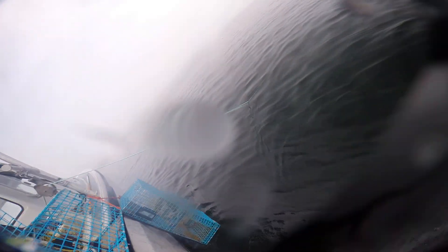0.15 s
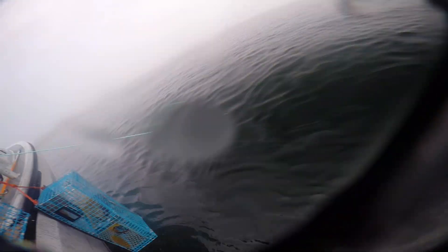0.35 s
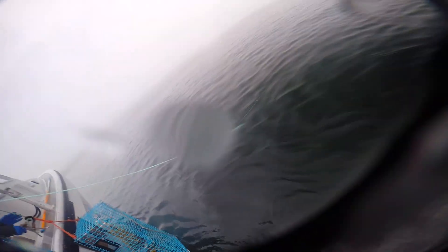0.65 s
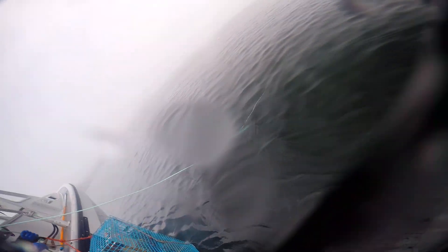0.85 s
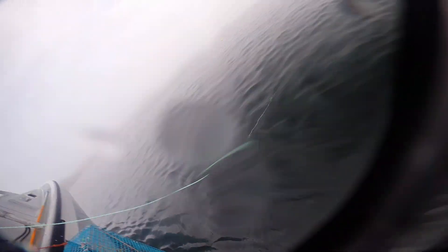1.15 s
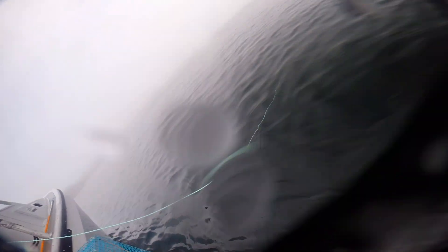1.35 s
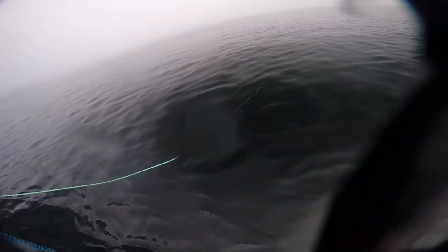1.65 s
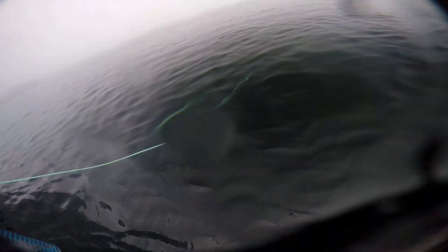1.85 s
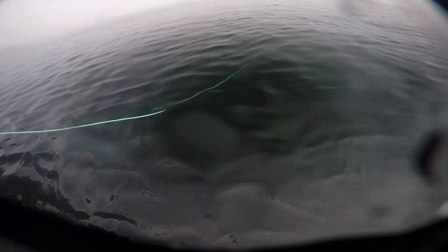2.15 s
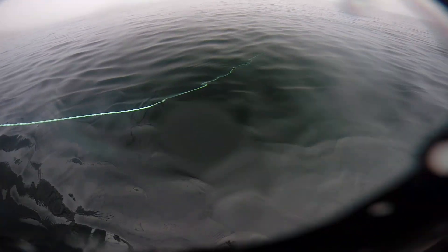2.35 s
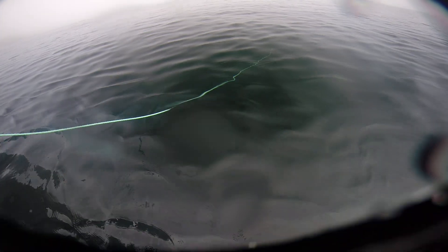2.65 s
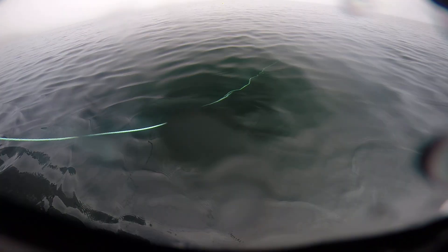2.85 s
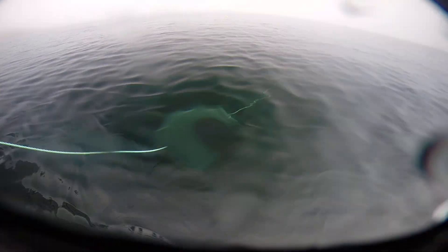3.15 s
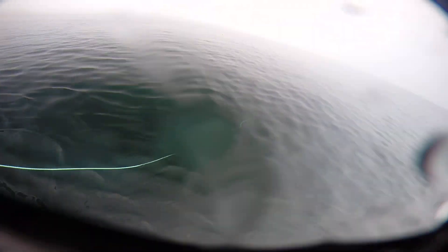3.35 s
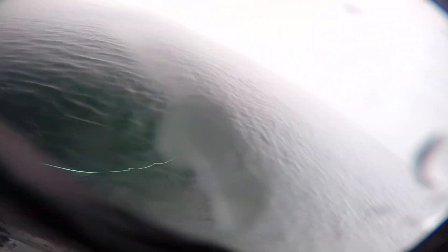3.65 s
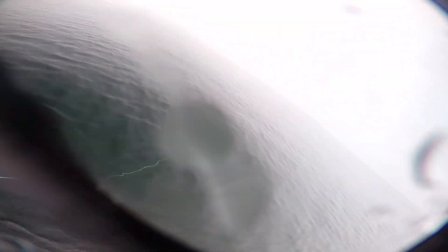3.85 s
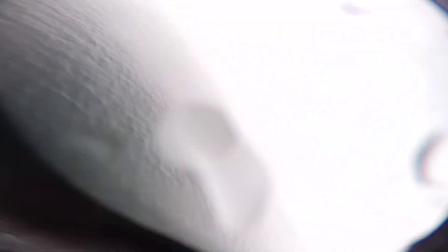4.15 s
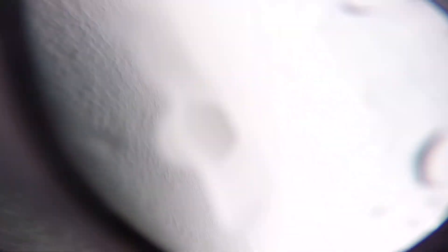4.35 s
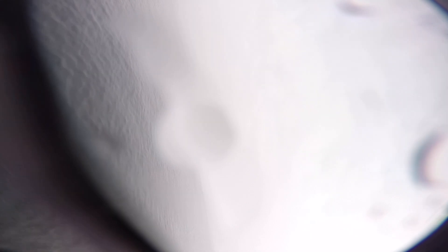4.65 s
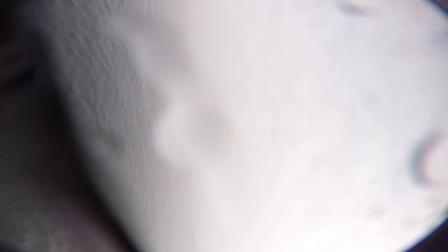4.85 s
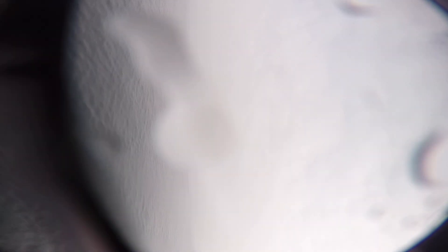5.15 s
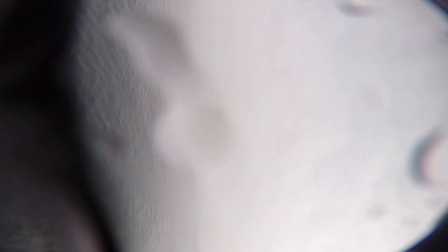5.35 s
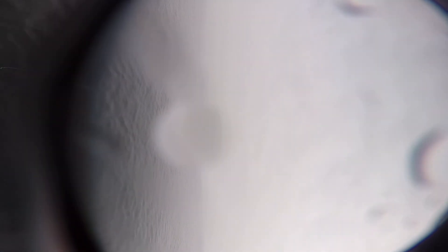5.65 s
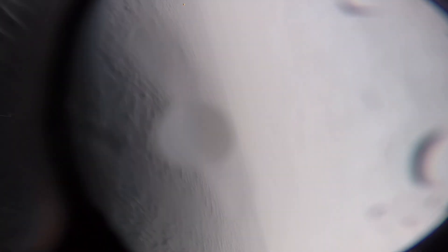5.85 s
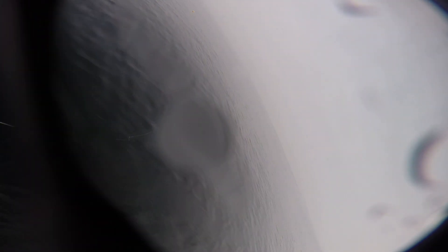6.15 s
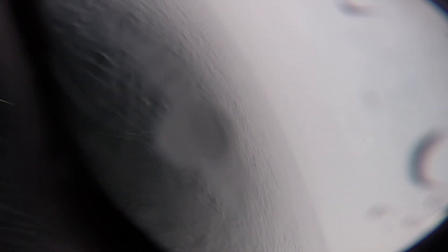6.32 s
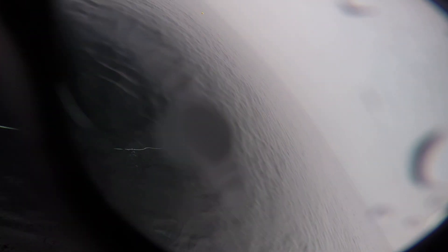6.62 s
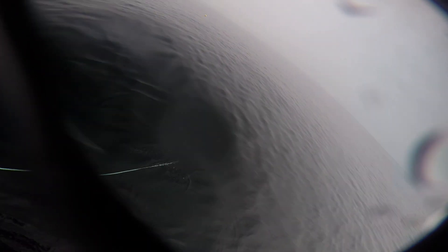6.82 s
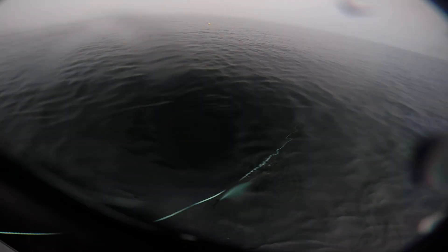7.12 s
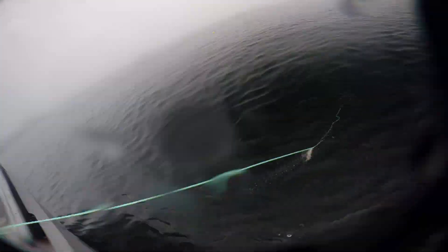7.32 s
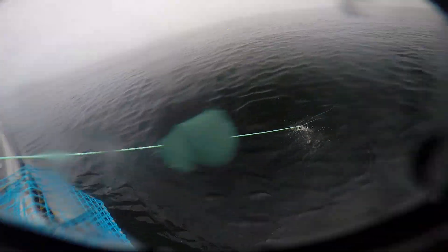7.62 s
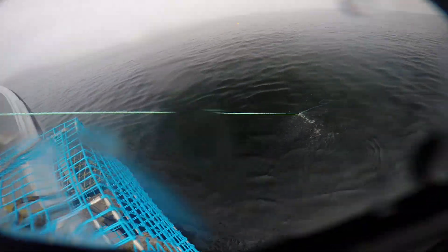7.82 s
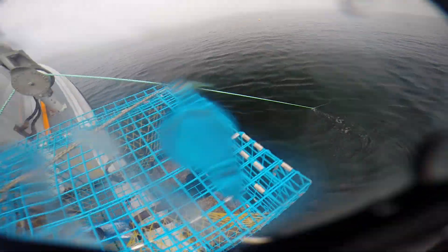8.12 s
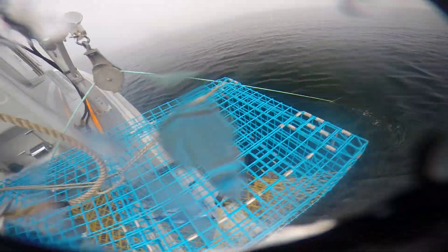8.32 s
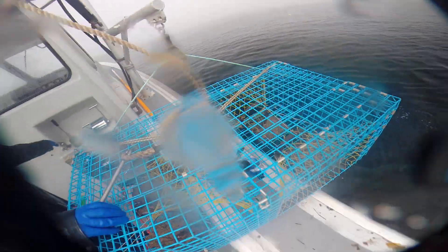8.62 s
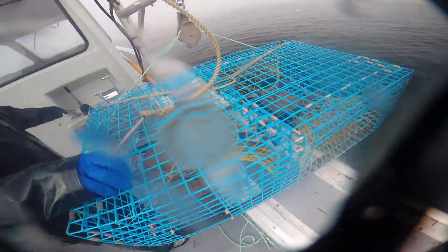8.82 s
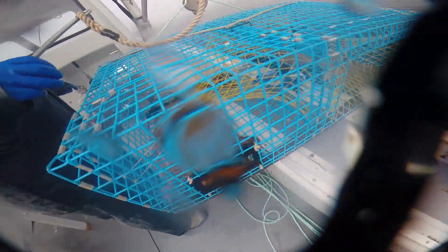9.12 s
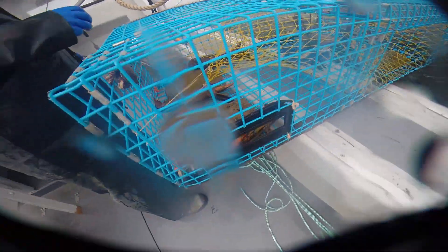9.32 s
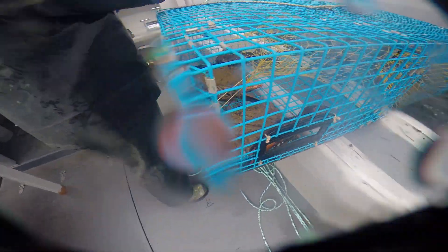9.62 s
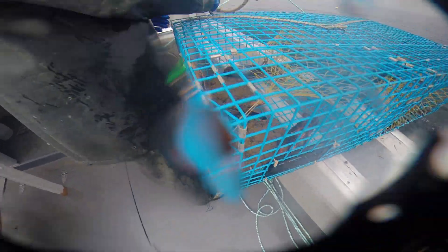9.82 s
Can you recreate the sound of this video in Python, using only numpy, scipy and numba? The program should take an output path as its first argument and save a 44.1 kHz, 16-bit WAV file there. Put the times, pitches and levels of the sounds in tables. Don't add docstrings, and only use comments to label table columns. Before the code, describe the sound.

A sealed microphone on a pole aboard a boat at sea; everything is close, boxy and muffled. From 0 to 1 s, deep wobbling rumble and groans, wet glove scrapes, a brief squeak and a cluster of hard hollow knocks around 0.3 to 0.8. From 1 to 2.5 s, rough rubbing with ringing pole tones, a squeaky catch near 1.8 and a heavy thud at 2.2. Then it quiets; faint ticks at 3.2, a loud double knock at 3.6. Dull sea hiss and a very faint high whine surface, with spray, clicks and thin wire tinks around 4.6 to 5.4. Scraping swells from 6.7, bursting into a hard ringing snap at 7.3, rubber chirps near 7.75, and a lurching groan and scrape at 8.2. Handling fades by 9, leaving muffled wash, dripping mesh and a small dull knock at 9.8.

```python
import sys
import numpy as np
from scipy import signal
from scipy.io import wavfile
from scipy.ndimage import uniform_filter1d
from numba import njit

SR = 44100
rng = np.random.default_rng(int(sys.argv[2]) if len(sys.argv) > 2 else 0)


def amplitude_ratio(level_db):
    exponent = np.asarray(level_db, float) / 20
    return 10 ** exponent


def dump(signal):
    limited = np.clip(np.atleast_2d(signal).T, -1, 1)
    pcm = np.round(limited * 32767).astype(np.int16)
    wavfile.write(sys.argv[1], SR, pcm)


N = 440118
T = np.arange(N) / SR


def unit(x):
    return x / np.sqrt(np.mean(x ** 2))


def noise():
    return rng.standard_normal(N)


def band(x, lo_hz, hi_hz, order=2):
    edges = [lo_hz, min(hi_hz, 0.45 * SR)]
    return signal.sosfilt(signal.butter(order, edges, "band", fs=SR, output="sos"), x)


def muffle(x, hz, order=4):
    return signal.sosfilt(signal.butter(order, hz, fs=SR, output="sos"), x)


def ring(x, modes):
    out = 0
    for k, (hz, width, db) in enumerate(modes):
        out = out + (-1) ** k * amplitude_ratio(db) * signal.lfilter(*signal.iirpeak(hz, hz / width, SR), x)
    return out


def walk(rate):
    hold = int(SR / rate)
    levels = np.repeat(rng.standard_normal(N // hold + 1), hold)
    return unit(uniform_filter1d(levels, hold)[:N])


def burst(start, rise, t60):
    t = np.arange(int((rise + 1.2 * t60) * SR)) / SR
    fall = amplitude_ratio(-60 * np.maximum(t - rise, 0) / t60)
    return int(start * SR), np.minimum(t / rise, 1) * fall


def add(out, i, x):
    out[i:i + len(x)] += x[:N - i]


def surge(out_power, start, db, hold, rise, fall):
    first, last = int((start - 4 * rise) * SR), int((start + hold + 4 * fall) * SR)
    a, b = np.clip([first, last], 0, N)
    t = T[a:b] - start
    slope_db = -20 * (np.maximum(-t, 0) / rise + np.maximum(t - hold, 0) / fall)
    add(out_power, a, amplitude_ratio(2 * (db + slope_db)))


def glide(rows, ratio, gain, waver):
    out = np.zeros(N)
    for start, length, db, first_hz, last_hz in rows:
        i, u = int(start * SR), np.linspace(0, 1, int(length * SR))
        span = slice(i, i + len(u))
        pitch = ratio * (first_hz + (last_hz - first_hz) * u) * waver[span]
        tone = np.sin(np.cumsum(2 * np.pi * pitch / SR))
        add(out, i, amplitude_ratio(db) * gain[span] * np.sin(np.pi * u) * tone)
    return out


# frequency in Hz, density in dB per Hz.
SEA_COLOUR = [(350, -16.5), (700, 1), (1350, -0.5), (1650, 5), (2900, -6), (4800, -20.5), (7000, -19),
              (14000, -33.5)]
# time in seconds, wash in dB, dripping wire mesh in dB.
SEA_LEVEL = [(0, -60, -88.5), (2.6, -57, -66.5), (3.4, -56, -71.5), (4.4, -56, -76), (5.3, -49, -62),
             (5.7, -53, -70), (6.3, -50, -65), (7.7, -48, -53), (7.85, -43.5, -56.5), (8.05, -43.5, -56.5),
             (8.2, -43, -51.5), (8.9, -49.5, -61), (9.5, -49.5, -59), (9.98, -49, -54.5)]
# frequency in Hz, width in Hz, level in dB.
MESH_MODES = [(3800, 600, 6), (4520, 330, 10), (5670, 800, 8)]


def sea():
    hz, density_db = np.transpose(SEA_COLOUR)
    s, wash_db, mesh_db = np.transpose(SEA_LEVEL)
    wash, swell, hiss = 0, walk(1.5), noise()
    for mid in 340 * 2 ** np.arange(0, 5.6, 0.25):
        colour_db = np.interp(np.log(mid), np.log(hz), density_db) + 10 * np.log10(mid)
        gain_db = colour_db + 0.7 * swell + 1.1 * walk(12)
        own_hiss = np.roll(hiss, int(mid))
        wash = wash + amplitude_ratio(gain_db) * unit(band(own_hiss, mid * 0.912, mid * 1.075))
    drips = noise() * amplitude_ratio(1.4 * walk(30))
    mesh = unit(ring(ring(drips, MESH_MODES), MESH_MODES))
    return unit(wash) * amplitude_ratio(np.interp(T, s, wash_db)) + mesh * amplitude_ratio(np.interp(T, s, mesh_db))


# frequency in Hz, level in dB.
WHINE_TONES = [(5850, -86), (8777, -86), (11688, -91), (14626, -83), (14690, -97)]


def whine():
    return sum(amplitude_ratio(db + 2.0) * np.sin(2 * np.pi * hz * T) for hz, db in WHINE_TONES)


# time in seconds, sway in dB.
SWAY = [(0, -17), (1.06, -35), (2.5, -31.5), (2.87, -47), (2.95, -39), (3.5, -47), (3.9, -42.5), (4.0, -36),
        (4.54, -46), (5.2, -41), (5.55, -38), (5.65, -46.5), (6.7, -32), (7.1, -24), (7.6, -22),
        (7.97, -30), (9.0, -41.5), (9.98, -46.5)]
# start in seconds, first bending in dB, second bending in dB against
# the first, hold in seconds.
LURCHES = [(0.0, -21.5, -1, 0.16), (0.102, -24.5, 6, 0.085), (0.315, -16, -7.5, 0.1), (0.447, -17, -2, 0.091),
           (0.68, -23, -15, 0.022), (0.8, -24, -9, 0.076), (1.111, -35, -32, 0.034),
           (1.256, -27.5, -30, 0.037), (1.44, -25, -1, 0.13), (1.625, -22, -13.5, 0.16),
           (1.886, -22, -3.5, 0.055), (1.99, -22, -12, 0.11), (2.2, -23.5, 2, 0.022), (2.242, -28, -5, 0.24),
           (3.034, -31.5, -15, 0.062), (4.63, -39.5, -7, 0.23), (5.295, -51, -4, 0.095),
           (7.125, -25, -14, 0.0082), (7.27, -19.5, -3, 0.035), (7.34, -16, -19, 0.033),
          (7.41, -24.5, 3.5, 0.094), (8.0, -29.5, -0.5, 0.093), (8.091, -21.5, -6, 0.053),
          (8.18, -16.5, -18, 0.11), (8.33, -15, -13, 0.042), (8.54, -27.5, 0, 0.27),
          (8.77, -27.5, -13, 0.052), (8.9, -29.5, -32, 0.042)]


def hand():
    sway_db = np.interp(T, *np.transpose(SWAY))
    slow, quick, stiff = amplitude_ratio(2 * np.array([sway_db, sway_db - 8, sway_db - 9.5]))
    rise_s, fall_s = 0.12, 0.085
    for start, slow_db, against_db, hold in LURCHES:
        quick_db = slow_db + against_db
        stiff_db = -26 + 0.8 * (quick_db + 20)
        for group, group_db in ((slow, slow_db), (quick, quick_db), (stiff, stiff_db)):
            surge(group, start, group_db, hold, rise_s, fall_s)
    scrape = amplitude_ratio(-7) * slide()[0]
    return np.sqrt([slow, quick, stiff + scrape ** 2])


# frequency in Hz, width in Hz, level in dB.
SLOW_BEND = [(30, 35, -14), (46.7, 16.6, -4), (61.5, 15, -4.5), (91, 17.5, -1.5)]
# frequency in Hz, width in Hz, level in dB.
QUICK_BEND = [(140, 9, 0), (168, 30, -10), (118, 18, -7)]
# frequency in Hz, width in Hz, level in dB.
STIFF_BEND = [(198.8, 12.6, 4), (261.2, 30.4, 4), (307, 37, 5), (381, 283, -6.5)]


def shake():
    out = 0
    for modes, gain, lumpy_db in zip((SLOW_BEND, QUICK_BEND, STIFF_BEND), hand(), (2.5, 3.5, 4.5)):
        swing = ring(noise() * amplitude_ratio(lumpy_db * walk(25)), modes)
        swing = muffle(swing, 1.76 * max(mode[0] for mode in modes), order=3)
        held = np.sqrt(uniform_filter1d(swing ** 2, int(0.09 * SR)))
        out = out + unit(swing / held ** 0.54) * gain
    return out


# start in seconds, peak in dB,
# treble in dB against the peak, length in seconds.
SPRAY = [(0, -40.5, 2.5, 0.011), (0.164, -47, -8, 0.0082), (0.2, -42.5, -8.5, .04), (0.372, -45, -9, .01),
         (0.411, -39.5, -12.5, .01), (1.098, -57, -7, .04), (1.3, -56.5, -3.5, .04), (2.436, -55, 2, .02),
         (0.653, -33, -28, 0.0043), (3.107, -33, -31, 0.017), (3.196, -32, -20, 0.03),
         (3.224, -38.5, -27, 0.085), (3.291, -60, -2, 0.015), (4.635, -33.5, -22, 0.28),
         (4.681, -35, -23.5, 0.087), (4.694, -35.5, -6, 0.025), (4.709, -40.5, -8, 0.058),
         (4.75, -41, -25, 0.07), (4.931, -34, -34, 0.026), (4.939, -36, -30, 0.068),
         (5.172, -32.5, -29, 0.14), (5.213, -38, 4.5, 0.031), (5.234, -39.5, -7, 0.036),
         (5.291, -45, -14, 0.021), (5.376, -40.5, -13, 0.044), (5.418, -41.5, -11.5, 0.055),
         (5.8846, -43, -8.5, 0.089), (9.877, -32.5, -17.5, 0.052)]


def spray():
    dull, bright = np.zeros(N), np.zeros(N)
    for start, db, treble_db, length in SPRAY:
        i, env = burst(start, 0.0039, 2.9 * np.clip(length, 0.003, 0.12))
        add(dull, i, amplitude_ratio(db - 15.0) * env)
        add(bright, i, amplitude_ratio(db + treble_db - 6.0) * env)
    grains = noise() * amplitude_ratio(4.9 * walk(250))
    drops = noise() * (0.22 + 4 * (rng.random(N) < 900 / SR))
    hollow = ring(dull * drops, [(527, 136, 1.5), (1630, 390, 1.0), (2050, 200, 4.0),
                                 (2710, 260, 3.0), (4240, 720, -5.5), (5600, 1160, -10.0)])
    hiss = unit(muffle(band(grains, 4000, 13000), 15000))
    return amplitude_ratio(22.5) * muffle(hollow, 8000) + bright * hiss


# start in seconds, peak in dB,
# frequency in Hz, ring in seconds.
CLINKS = [(0.039, -14, 2030, 0.03), (.046, -29, 2250, .02), (1.843, -14.5, 1593, 0.041),
          (1.848, -14, 1890, 0.025), (3.626, -37, 1830, 0.06), (3.642, -42, 1650, 0.052),
          (3.258, -40, 1500, .04), (3.272, -44, 1900, 0.035), (1.722, -17.5, 1596, 0.043),
          (1.8465, -7.5, 1700, 0.014), (3.2026, -23, 2715, 0.055), (3.257, -37, 2800, 0.054),
          (4.647, -31, 1900, 0.11), (4.68, -26.5, 1550, 0.069), (4.748, -31.5, 1510, 0.071),
          (5.185, -31, 1495, 0.045), (5.2974, -37, 1514, 0.044), (7.313, -0.5, 1585, 0.059),
          (8.1763, -15, 1605, 0.04), (8.858, -32.5, 1600, 0.029), (8.15, -24, 796, .09),
          (7.355, -20, 797, 0.067)]
# start in seconds, peak in dB, frequency in Hz, ring in seconds.
TINKS = [(1.3, -57, 7700, 0.046), (3.137, -39, 4000, 0.046), (3.153, -46, 5600, .03),
         (3.15, -42, 4470, 0.051), (3.2, -35, 6300, 0.037), (3.2, -32, 3880, 0.048),
         (3.228, -40, 3900, 0.042), (3.5, -50.5, 5600, 0.17), (4.66, -44, 5600, .08),
         (4.703, -35, 4340, 0.22), (4.75, -34, 2860, 0.054), (4.76, -57, 7340, .1), (4.79, -53, 3360, 0.5),
         (4.85, -54, 3380, .4), (6.36, -57, 4300, .6), (3.335, -50, 5500, .04), (3.373, -50, 5650, 0.08),
         (5.135, -56, 8000, .1), (5.365, -54, 5650, .06), (5.197, -36, 4200, 0.055), (5.02, -64, 13200, .2),
         (4.665, -64, 13100, .15), (5.195, -58, 12900, .1), (5.055, -50, 5660, 0.13),
         (5.14, -51, 5700, 0.22), (5.217, -33, 4080, 0.1), (5.3, -49, 5700, 0.35)]


def clinks():
    out, tremble, flutter = np.zeros(N), walk(250), walk(300)
    for start, db, hz, t60 in CLINKS + TINKS:
        rise_s = 0.003 if hz > 2500 else 0.007
        i, env = burst(start, rise_s, np.clip(t60, 0.01, 0.6))
        span = slice(i, i + len(env))
        depth = 0.004 if hz > 3000 else 0.012
        phase = np.cumsum(2 * np.pi * hz * (1 + depth * tremble[span]) / SR)
        tone = np.sin(phase)
        if 3000 < hz < 6000:
            tone = tone + amplitude_ratio(-24) * np.sin(1.4 * phase) + amplitude_ratio(-21) * np.sin(2.32 * phase)
        add(out, i, amplitude_ratio(db - 4 + 3 * flutter[span]) * env * tone)
    return out


# start in seconds, level in dB, hold in seconds,
# rise and fall in seconds per 20 dB.
STROKES = [(0.056, -26.5, 0.077, 0.085, 0.024), (0.162, -33, 0.055, .02, .1),
           (0.239, -31, 0.13, 0.047, .04), (.385, -43.5, 0.046, .02, 0.061),
           (0.437, -41.5, 0.071, 0.082, 0.017), (0.804, -43, 0.032, 0.17, .1),
           (0.957, -28.5, 0.12, 0.12, 0.13), (1.12, -37, 0.112, 0.11, 0.0066),
           (1.38, -29.5, 0.37, 0.026, 0.015), (1.81, -43, 0.036, 0.084, 0.044),
           (1.873, -30.5, 0.35, 0.023, 0.16), (2.299, -32.5, 0.13, .1, 0.017),
           (2.445, -46.5, 0.13, .02, .04), (3.14, -41, 0.034, 0.34, 0.14),
           (3.632, -47.5, 0.017, 0.0048, 0.014), (6.755, -29.5, 0.13, 0.05, 0.059),
           (6.974, -25, 0.14, 0.22, 0.016), (7.145, -39, 0.045, .05, .05),
           (7.254, -25.5, 0.13, 0.088, 0.32), (7.512, -37, 0.13, .1, .1),
           (7.72, -28.5, 0.0915, 0.34, 0.011), (8.089, -27.5, 0.052, 0.13, 0.19),
           (8.181, -37, 0.188, .05, 0.013), (8.394, -50, 0.11, .03, 0.059),
           (8.532, -34.5, 0.26, 0.05, 0.11)]
# start in seconds, peak in dB,
# rise and fall in seconds per 20 dB.
JERKS = [
    (0.046, -35, 0.039, 0.1),
    (.275, -33.5, 0.036, 0.11),
    (.56, -37, 0.025, 0.021),
    (1.745, -28.5, 0.12, 0.017),
    (1.85, -28, 0.024, 0.043),
    (1.946, -22, 0.066, 0.32),
    (2.182, -21.5, 0.18, 0.19),
    (6.69, -54, 0.86, .05),
    (7.32, -12.5, 0.019, 0.0097),
    (8.182, -21.5, 0.12, 0.011),
]


def slide():
    power = np.full(N, 1e-12)
    for row in STROKES:
        surge(power, *row)
    for start, db, rise, fall in JERKS:
        surge(power, start, db, 0, rise, fall)
    touch = np.clip(power / amplitude_ratio(-110), 0, 1)
    over_db = np.minimum(10 * np.log10(power) + 30, 7)
    return np.sqrt(power), touch * amplitude_ratio(-53.5 + 0.94 * over_db)


def drift(x, wander):
    speed = 0.009 * uniform_filter1d(wander - wander.mean(), 3000)
    return np.interp(np.arange(N) + np.cumsum(speed), np.arange(N), x)


# frequency in Hz, width in Hz, level in dB.
POLE = [(391, 27, 1), (777, 58, 4.5), (1020, 28, -13.5), (1188, 50, -6), (1577, 50, 3), (1710, 105, 1.5),
        (2015, 44, -0.5), (2425, 140, -5), (2796, 130, -3.5), (3063, 80, -11)]
# frequency in Hz, width in Hz, level in dB.
HOUSING = [(3725, 550, -0.5), (4230, 360, -12.5), (4790, 370, -0.5), (5600, 450, -8.5), (6355, 300, 1.5),
           (7230, 380, -6.5), (8100, 300, -15.5), (8700, 490, -11.5), (9610, 360, -12.5),
           (10950, 540, -21.5), (12750, 600, -24.5)]
# time in seconds,
# tilt in dB per octave, middle modes in dB.
GRIP = [
    (0, 1, 1),
    (1.05, 1.5, 0.5),
    (1.45, -1.5, -2),
    (1.75, 2, -1),
    (2.2, 0.5, -1.5),
    (6.8, -0.5, -2),
    (7.3, 0, 1.5),
    (7.7, 0.5, -5.5),
    (8.1, 0.5, 2),
    (8.8, -0.5, -1),
]


def rub():
    slips = noise() * amplitude_ratio(0.23 * walk(60) + 2.3 * walk(200))
    s, tilt_db, middle_db = np.transpose(GRIP)
    modes = 0
    for k, mode in enumerate(POLE):
        favour = walk(6)
        if 1500 < mode[0] < 1800:
            lean_db = np.interp(T, s, middle_db)
        else:
            lean_db = np.log2(mode[0] / 1600) * np.interp(T, s, tilt_db)
        tone = drift(np.roll(ring(slips, [mode]), 37 * k), np.roll(favour, SR))
        modes = modes + amplitude_ratio(3 * favour + lean_db) * tone
    wash = 0
    for hz in (230, 370, 590, 950, 1500, 2200):
        wash = wash + amplitude_ratio(3.7 * walk(5)) * band(np.roll(slips, int(hz)), hz, 1.57 * hz)
    body = unit(muffle(unit(modes) + amplitude_ratio(-5.5) * unit(wash), 2795, order=4))
    body = signal.lfilter(*signal.iirnotch(2600, 2600 / 230, SR), body)
    edge = 0
    for hz, width, db in HOUSING:
        once = ring(slips, [(hz, 2.1 * width, 0)])
        twice = ring(once, [(hz, 2.1 * width, db)])
        edge = edge + amplitude_ratio(2.0 * walk(5.9)) * np.roll(twice, int(hz / 2))
    level, bright = slide()
    return level * body + bright * unit(edge)


# start in seconds,
# length in seconds, level in dB, first and last frequency in Hz.
GROANS = [(.09, 0.17, -9, 112.4, 97.7), (3.6, 0.19, -28, 84.5, 83.7), (.32, 0.13, -10, 74.5, 102.3),
          (2.17, 0.29, -24, 138.7, 137), (8.165, 0.064, -4, 59.2, 92.7), (8.18, 0.14, -9.5, 140, 144.7),
          (8.29, 0.189, -14.5, 138.5, 135.7), (8.58, .3, -19.5, 152.4, 128.7), (.06, .08, -23, 387, 378),
          (.11, 0.12, -25.5, 264, 245), (.435, 0.083, -13, 267, 243), (.74, 0.026, -25, 270, 220),
          (.8, 0.029, -29.5, 284, 232), (1.09, 0.13, -21, 95.4, 88), (.53, 0.046, -9.5, 119.5, 101.4),
          (7.7, 0.065, -28.5, 396, 406), (3.655, 0.034, -42, 296, 287), (1.45, 0.13, -19.5, 159.5, 191),
          (1.55, .15, -24.5, 261.6, 199), (1.5, 0.15, -21, 75, 100), (1.98, 0.106, -13.5, 80.2, 94),
          (7.112, .042, -8.5, 50.7, 54.3), (7.19, 0.123, -19, 85.4, 177), (7.26, 0.057, -19.5, 278, 242),
          (7.265, 0.056, -6, 72.3, 87.6), (7.31, 0.07, -11, 91.3, 81), (7.35, 0.102, -17.5, 233, 172),
          (7.43, 0.089, -20, 168, 107), (8.045, 0.038, -25, 405, 406), (8.06, 0.051, -12, 86, 75),
          (8.165, 0.046, -20, 260, 250), (8.2, 0.11, -17.5, 230, 168), (8.24, .06, -19, 70, 80),
          (8.52, 0.083, -15, 108, 133), (8.74, 0.16, -16.5, 96, 84.3)]


def groans():
    return glide(GROANS, 1, amplitude_ratio(2.0 * walk(40)), 1 + 0.025 * walk(30))


# start in seconds, peak in dB, bass in dB, treble in dB, contact in seconds.
KNOCKS = [(0.274, -2.5, -4, -38, 0.0068), (0.459, -13, -21.5, -46, 0.0066), (0.478, -5.5, -13, -59, 0.038),
          (0.5365, 5, -10, -14.5, 0.011), (0.547, -1.5, -13, -45, 0.012), (0.557, -34, -25, -38.5, 0.043),
          (0.628, 6, -10, -21, 0.0088), (0.636, -1.5, 2.5, -22, 0.0074), (0.682, -12.5, -6, -35, 0.0095),
          (0.754, -18, -3, -49, 0.0089), (0.808, -10.5, -23, -40, 0.051), (0.821, -21, 2, -40, 0.011),
          (1.471, -9.5, -27, -25, 0.014), (2.166, -2, 4, -30, 0.024), (3.587, 4.5, -4, -19, 0.0053),
          (3.596, 7.5, 2, -17.5, 0.0021), (6.25, -37, -14, -46, 0.015), (7.128, -20, -20, -49, 0.012),
          (7.266, -3, -22, -27, 0.0086), (8.182, -41, -32, -22.5, 0.0064), (9.831, -39, -18.5, -48, 0.0072)]


def knocks():
    out = np.zeros(N)
    for start, db, bass_db, treble_db, contact in KNOCKS:
        i, env = burst(start, 0.0032, 4 * np.clip(contact, 0.002, 0.05))
        t = np.arange(len(env)) / SR
        grit = rng.standard_normal((2, 12000))[:, :len(env)]
        push = np.exp(-((t - 0.0011) / 0.00044) ** 2) + 0.75 * env * grit[0]
        push = np.pad(push, (0, SR // 3))
        thud = ring(push, [(191, 29.0, 2.5), (262, 81.0, 7.5), (374, 143, -3.5), (835, 97, -1.0)])
        thud = muffle(thud + 0.54 * band(push, 280, 780), 990, order=5)
        swing = ring(push, [(81.9, 8.7, 12.3), (134.6, 16, 1)])
        crack = band(env * grit[1], 1000, 2640, order=3)
        crack = crack + 0.05 * band(env ** 2.5 * grit[1], 3800, 9000)
        add(out, i, amplitude_ratio(db - 5.0) * thud / abs(thud).max())
        add(out, i, amplitude_ratio(bass_db - 10.0) * swing / abs(swing).max())
        add(out, i, amplitude_ratio(treble_db + 1.5) * crack / abs(crack).max())
    return out


# start in seconds, peak in dB,
# frequency in Hz, treble in dB against the peak.
TICKS = [(0.541, -36.5, 2480, -15), (0.5573, -38, 3500, -6.5), (.563, -43, 2500, -9.5),
         (.566, -31.5, 2000, -15), (.64, -24.5, 2480, -13), (0.661, -24, 1780, -11), (.673, -51, 2800, -17),
         (1.373, -42, 2000, -24), (3.2005, -32, 5500, -10), (3.296, -44, 7500, -2.5),
         (3.307, -55, 7000, -1), (3.6018, -17, 2650, -9.5), (4.636, -45, 4000, 0),
         (4.6813, -24, 1700, -12.5), (4.701, -41, 2700, -8), (4.7067, -30, 4600, -6),
         (4.749, -36, 5000, -11), (4.9331, -31.5, 1910, -5.5), (4.9408, -32, 2700, -9),
         (4.945, -31, 2800, -14), (4.952, -33, 2710, -14), (4.6463, -30, 2000, -19),
         (4.722, -36, 2000, -10), (4.733, -34, 1900, -12), (5.186, -30, 2400, -14), (4.915, -42, 2200, -6),
         (5.06, -52, 6000, 2), (5.324, -47, 7000, 4), (5.108, -38, 810, -28), (5.1805, -30, 2100, -15.5),
         (5.2175, -33, 3990, 7.5), (5.226, -33, 1710, -8), (5.251, -39, 1500, -12),
         (5.2968, -38, 1570, -17), (5.379, -43, 6800, 1), (5.42, -36.5, 2720, -9)]


def ticks():
    out, hit = np.zeros(N), np.eye(1, 600, 0)[0]
    fade = np.exp(-np.arange(600) / SR / 0.00089)
    for start, db, hz, treble_db in TICKS:
        grit = fade * rng.standard_normal(600)
        short = ring(hit, [(hz, hz / 8.3, 0)])
        click = band(grit, 3000, 7500, order=3)
        if hz > 3500:
            click = click + amplitude_ratio(-9) * band(grit, 8000, 15000)
        tick = muffle(short / abs(short).max(), 8000) + amplitude_ratio(treble_db) * click / abs(click).max()
        add(out, int(start * SR), amplitude_ratio(db) * tick)
    return out


# start in seconds, length in seconds, level in dB,
# first and last frequency in Hz.
SQUEAKS = [(7.2, .03, -23.5, 1776, 1854), (7.216, 0.026, -25, 1850, 2460), (7.225, .025, -21.5, 2370, 2580),
           (7.643, 0.047, -44, 4840, 4800), (7.68, 0.02, -40, 4000, 4000), (7.695, 0.014, -35, 4400, 4800),
           (7.71, 0.015, -32, 4650, 4420), (7.742, 0.021, -32, 4320, 4850),
           (7.771, 0.019, -29.5, 4720, 4380), (7.782, .012, -29, 3680, 3380),
           (7.794, 0.02, -25.5, 3490, 2900), (7.789, .018, -27, 2070, 2120)]


def squeaks():
    out = 0
    for ratio, db in ((1, -2.5), (0.73, -12), (1.08, -13), (2, -23.5)):
        out = out + glide(SQUEAKS, ratio, amplitude_ratio(db + 3.5 * walk(400)), 1 + 0.03 * walk(900))
    return out


@njit
def follow(x, attack, release):
    y, e = np.empty(len(x)), 0.
    for i in range(len(x)):
        e += (x[i] - e) * (attack if x[i] > e else release)
        y[i] = e
    return y


def scene():
    handling = shake() + spray() + clinks() + rub() + groans()
    handling = handling + muffle(knocks(), 7300, order=2) + ticks() + squeaks()
    attack_s, release_s = 0.00022, 0.17
    peak = follow(np.abs(handling), 1 / (attack_s * SR), 1 / (release_s * SR))
    duck = np.minimum(amplitude_ratio(-21.5) / (peak + 1e-9), 1) ** 0.73
    duck = uniform_filter1d(duck, 200)
    floor = duck * sea() + duck ** 1.7 * whine()
    return (handling + floor)[None]


def band_limit(x):
    return signal.sosfilt(signal.butter(12, 15250, fs=SR, output="sos"), x)


def record(dry):
    rounded = dry / (1 + np.abs(dry) ** 6) ** (1 / 6)
    return band_limit(rounded)


dry = scene()
out = record(dry)
dump(out)
```